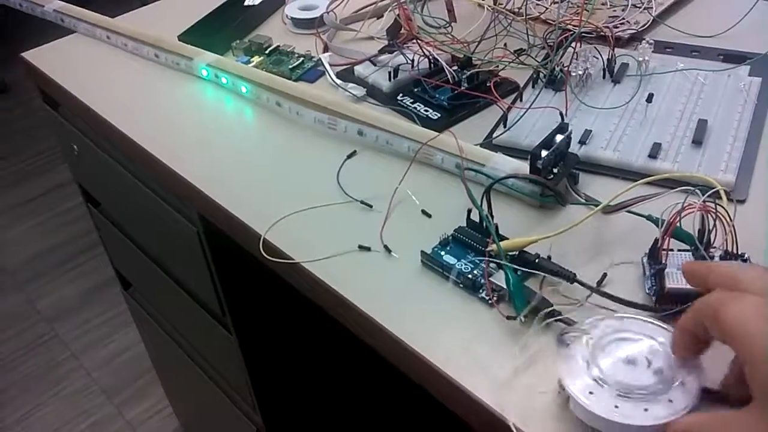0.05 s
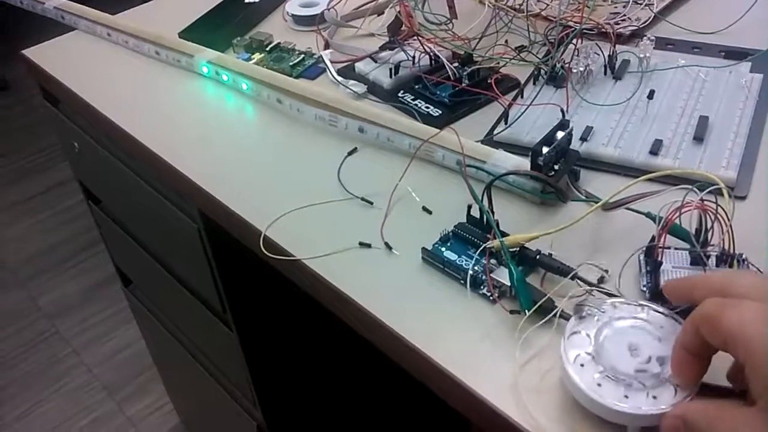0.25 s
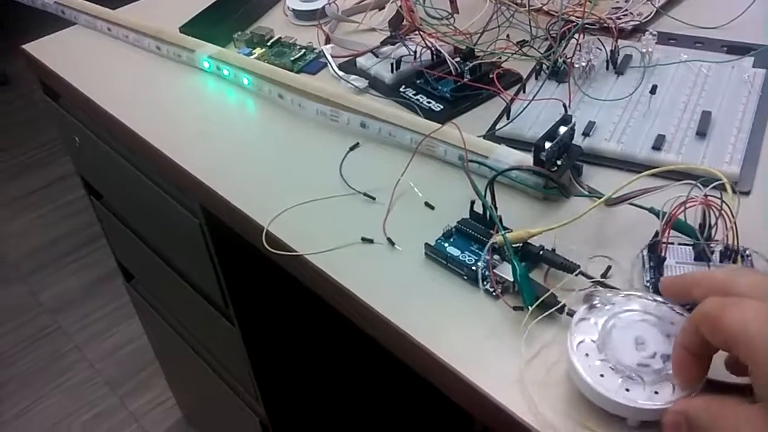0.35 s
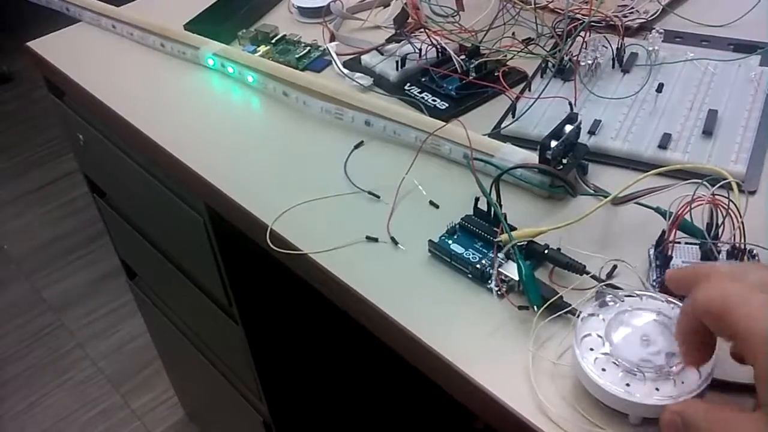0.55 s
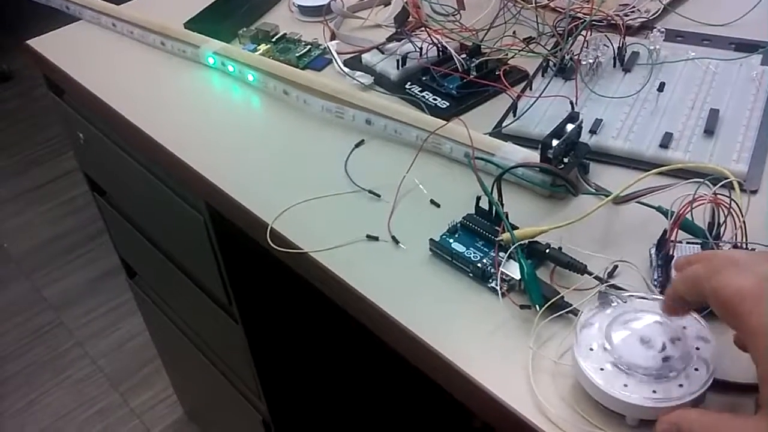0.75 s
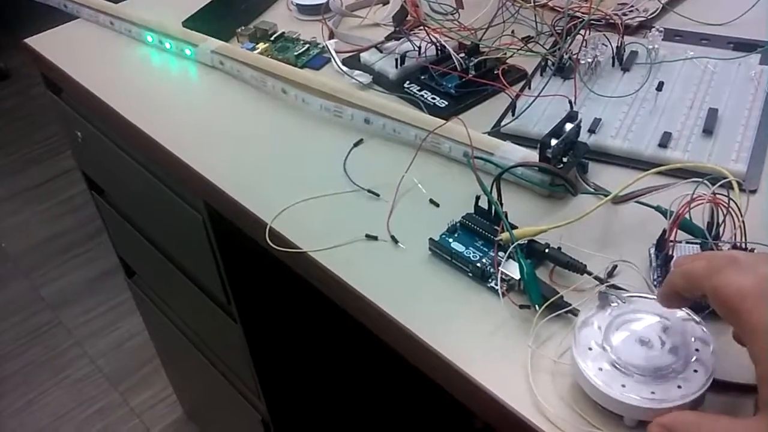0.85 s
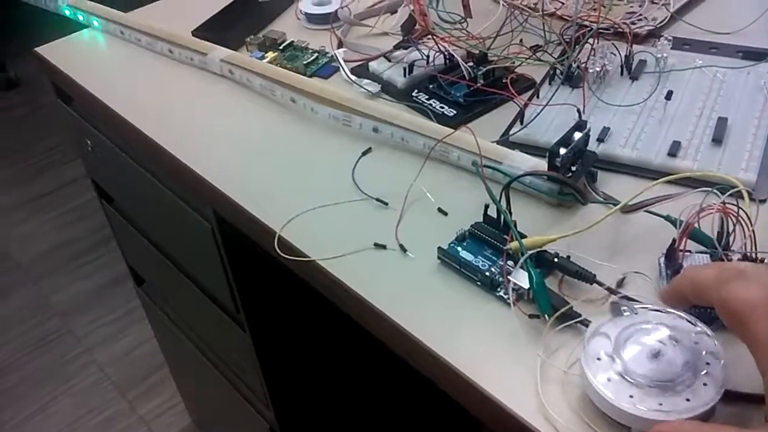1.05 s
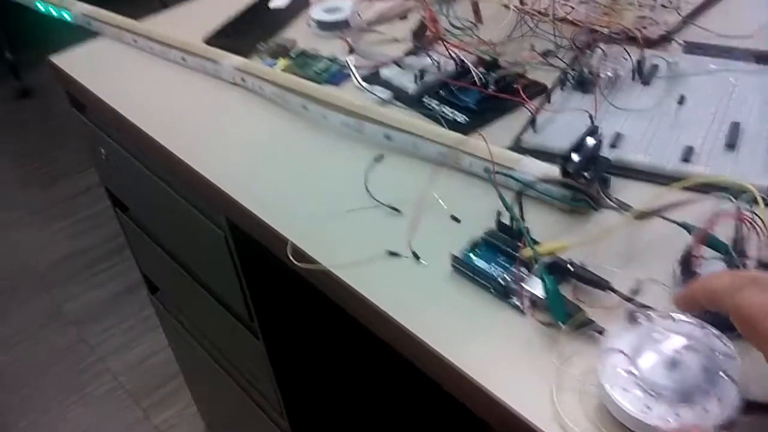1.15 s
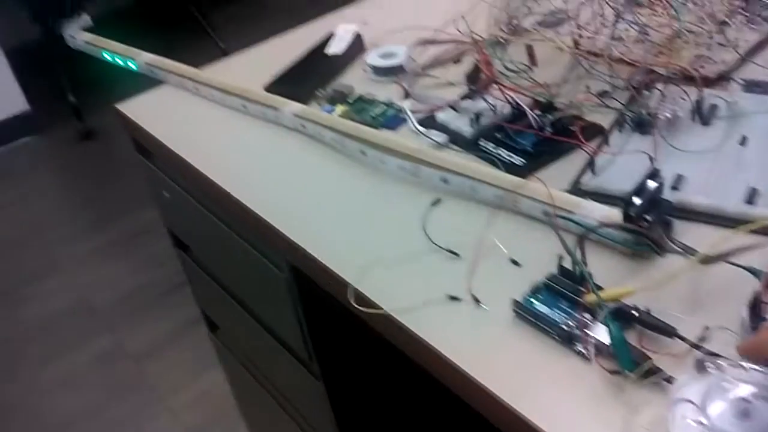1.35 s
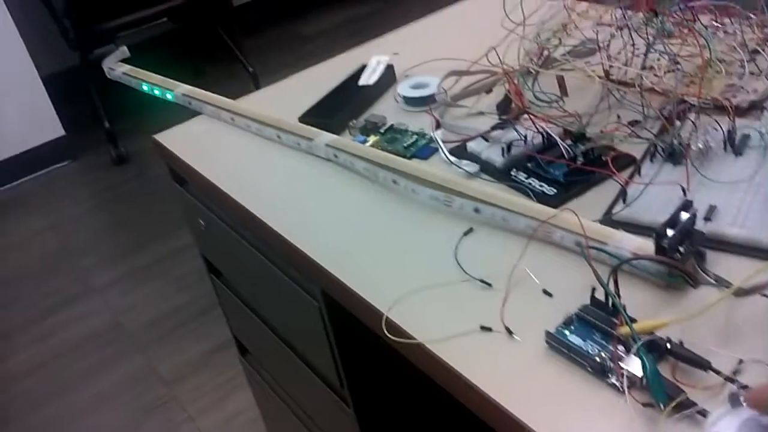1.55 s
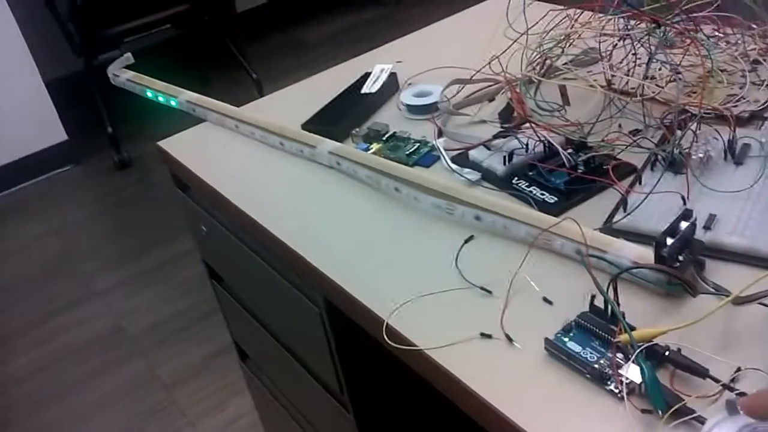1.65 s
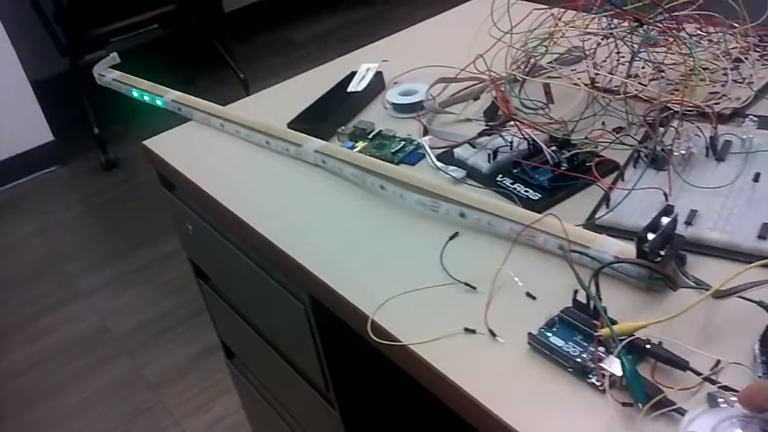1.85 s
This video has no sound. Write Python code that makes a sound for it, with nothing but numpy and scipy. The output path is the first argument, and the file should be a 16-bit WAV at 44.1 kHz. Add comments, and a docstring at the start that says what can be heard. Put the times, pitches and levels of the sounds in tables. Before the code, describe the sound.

A rotary telephone dial is wound with a short scrape and clacks against its stop. It is released with a second clack, then ticks and whirs back to rest, in a slightly echoing room with quiet ventilation.

```python
"""A scrape is heard first: a finger winds a rotary telephone dial, rubbing the wheel on its housing.
It clacks against the stop and is let go with a second clack; both set the dial and desk ringing.
The dial ticks free, its governor (the speed brake) whirrs as it runs back, and it knocks softly to rest.
Around it, a bare room echoes and the ventilation rumbles quietly."""
import sys
import numpy as np
from scipy import signal
from scipy.fft import rfft, irfft
from scipy.io import wavfile

SR = 44100
rng = np.random.default_rng(int(sys.argv[2]) if len(sys.argv) > 2 else 0)


def unload_wav(signal):
    """Save mono or channel-first audio to the path in sys.argv[1] as 16-bit WAV at rate SR, clipped to [-1, 1]."""
    wavfile.write(
        sys.argv[1],
        SR,
        np.round(np.clip(np.atleast_2d(signal).T, -1, 1) * 32767).astype(np.int16),
    )


N = 83790
TIME = np.arange(N) / SR
HZ = np.maximum(np.fft.rfftfreq(N, 1 / SR), 1)

# A fade time (t60) is how long a sound takes to drop by 60 dB.
# The clacks at the stop and on release:
# (time [s], rattle level [dB], rattle length [s], rattle fade time [s], ring build-up [s])
DIAL_CLACKS = [(.2380, -22.5, 0.012, 0.017, 0.0026), (0.6392, -27.5, 0.0027, 0.027, 0.0017)]


def clack_ring():
    """Each clack sets dial and desk ringing; the low tones swell last."""
    # Their natural tones: (pitch [Hz], fade time [s], level at the stop [dB], level on release [dB])
    tones = [(160.5, 0.11, -40.5, -42), (468, .065, -30.5, -42), (548.6, 0.055, -29.5, -37),
             (690, .04, -49, -40.5), (797, 0.049, -34, -69), (901, 0.065, -31, -55),
             (1033.7, 0.06, -27.5, -40.5), (1062, 0.066, -27.5, -45), (1181, 0.04, -55, -29.5),
             (1327, 0.027, -39.5, -30), (1607, 0.063, -28, -36.5), (1845, 0.033, -41, -29.5),
             (2194, 0.03, -28, -41), (2463, 0.0495, -33.5, -43), (4013, .024, -23.5, -54),
             (5430, 0.012, -21.5, -42), (6260, 0.015, -17.5, -34), (6840, 0.009, -16.5, -33)]
    lag_cycles = 4.2
    out = np.zeros(N)
    for clack, (start, *_, rise) in enumerate(DIAL_CLACKS):
        for hz, t60, *levels in tones:
            swell = rise + lag_cycles / max(hz, 400)
            tone = np.sin(2 * np.pi * (hz * TIME + rng.random()))
            out += from_db(levels[clack]) * tone * burst(start, t60, rise=swell, hold=swell)
    return out


def clack_rattle():
    """In each clack the parts rattle against each other for a few milliseconds."""
    # Tone colour of the rattle, one list per clack: (frequency [Hz], relative level [dB])
    colours = [
        [(100, -24.5), (250, -7.5), (900, -3.5), (1300, -3), (2800, -7.5), (4200, -3.5), (7000, -2.5),
         (8800, -13), (10000, -28), (16000, -39)],
        [(100, -3), (500, 4), (1800, -9), (2800, -9), (5300, -13), (6800, 6.5), (8000, -8.5), (9500, -24.5),
         (16000, -34)],
    ]
    out = np.zeros(N)
    for (start, db, length, t60, _), colour in zip(DIAL_CLACKS, colours):
        rattle = noise(from_db(at_hz(colour, HZ)))
        out += from_db(db) * rattle * burst(start, t60, rise=.0005, hold=length)
    return out


def winding():
    """The wheel rubs on its housing, and tiny slips rasp in the works as it speeds up."""
    # How hard the wheel rubs: (time [s], level [dB])
    effort = [(0, -48.5), (.06, -51.5), (.132, -50.5), (.140, -44), (.19, -40.5), (.215, -40.5),
              (.236, -43.5), (.25, -75)]
    # Tone colour of the rubbing: (frequency [Hz], relative level [dB])
    colour = [(80, -16), (200, -6.5), (560, 7), (1100, -5.5), (1900, -11.5), (2180, -1.5), (2600, -10),
              (6000, -10), (10000, -31.5), (16000, -50)]
    slips_per_s, rub_offset_db, rasp_peak_db = 3500, -3, -44
    times, levels = np.transpose(effort)
    effort_db = np.interp(TIME, times, levels)
    rasp_db = rasp_peak_db + 2.5 * (effort_db - levels.max())  # swells more steeply than the rub
    slips = (rng.random(N) < slips_per_s / SR) * rng.standard_normal(N)
    rasp = unit_level(irfft(rfft(slips) * metal_works(), N))
    rub = noise(from_db(at_hz(colour, HZ)))
    return from_db(rub_offset_db + effort_db) * rub + from_db(rasp_db) * rasp


def metal_works():
    """How strongly the metal parts inside the dial (the works) ring at each frequency."""
    # Where they ring most: (frequency [Hz], width [Hz], level [dB])
    resonances = [(2180, 78, -26), (3410, 320, -13.5), (4170, 120, -5.5), (4910, 200, -4.5),
                  (5510, 140, -2), (6040, 300, 1.5), (7030, 400, -4), (7830, 220, -2), (9400, 4000, -14.5)]
    return sum((-1) ** k * from_db(db) / (1 + 1j * hz / width * (HZ / hz - hz / HZ))
               for k, (hz, width, db) in enumerate(resonances))


def ticks():
    """Small parts catch in the works, each bringing out its own part of the metal's ring."""
    # The catches: (time [s], level [dB], fade time [s], favoured frequency [Hz])
    catches = [(.001, -34.5, 0.018, 6530), (0.085, -48.5, 0.059, 3830), (0.108, -54, 0.11, 5800),
               (.138, -42, 0.063, 3000), (0.186, -35, 0.019, 5860), (0.202, -43, 0.18, 5100),
               (.277, -34, .03, 6000), (0.283, -27.5, 0.014, 6940), (0.336, -32.5, 0.035, 6760),
               (0.355, -38.5, 0.017, 7400), (0.568, -46.5, 0.016, 6370), (0.799, -39, 0.045, 5050),
               (.800, -49.5, 0.046, 11300), (0.813, -52.5, 0.11, 3700), (0.842, -55.5, 0.3, 5900),
               (0.8623, -35.5, 0.023, 2620), (0.9018, -45.5, 0.1, 7300), (0.906, -45.5, 0.065, 2650),
               (0.933, -45.5, 0.025, 7500), (1.232, -54, 0.079, 2330), (1.254, -36, 0.014, 6260),
               (1.451, -61.5, 0.14, 6940)]
    width_octaves = .47
    metal = metal_works()
    out = np.zeros(N)
    for start, db, t60, hz in catches:
        colour = metal / (1 + (np.log2(HZ / hz) / width_octaves) ** 2)
        out += from_db(db) * burst(start, t60, rise=.0016) * noise(colour)
    return out


def gear_whirr():
    """On the run back the gear teeth scuff lightly, in much the same pattern on every turn."""
    # Tooth contacts in one turn of the governor gear: (position [share of a turn], relative level [dB])
    teeth = [(.05, 1), (.15, 1), (.27, 0), (.46, 0), (.58, 2), (.78, -1)]
    start_s, end_s, turn_s, jitter_s = .9265, 1.229, .0496, .0006
    whirr_db, spread_db = -49.5, 1.5
    scuffs = np.zeros(N)
    for turn_start in np.arange(start_s, end_s, turn_s):
        for share, db in teeth:
            when = turn_start + share * turn_s + jitter_s * rng.standard_normal()
            if when < end_s:
                strength = from_db(db + spread_db * rng.standard_normal())
                scuffs += strength * burst(when, t60=.033, rise=.0026)
    return from_db(whirr_db) * scuffs * noise(metal_works())


def spring_snaps():
    """The switch springs snap with a very high, short ring."""
    # The snaps: (time [s], level [dB])
    snaps = [(.2765, -39.5), (1.253, -43)]
    ring_hz, width_hz = 14700, 420
    zing = noise(1 / (1 + 1j * (HZ - ring_hz) / width_hz))
    return zing * sum(from_db(db) * burst(start, t60=.0193) for start, db in snaps)


def housing_knocks():
    """The housing bumps dully on the desk, each time with a hollow ring at its own pitch. The first row is no
    bump but a long, low hum near 210 Hz at the very start."""
    # The bumps, the first being the low hum: (time [s], level [dB], fade time [s], ring pitch [Hz])
    bumps = [(0.008, -45, 0.36, 212), (0.064, -40, .035, 776), (0.137, -38.5, 0.01, 2040),
             (0.791, -43.5, 0.028, 704), (1.227, -50, 0.097, 680), (1.743, -46.5, 0.086, 1385),
             (1.813, -63, 0.042, 745)]
    # Tone colour they all share: (frequency [Hz], relative level [dB])
    colour = [(60, -10), (170, 6), (600, -1.5), (900, -3), (1300, -8.5), (2100, -8), (2800, -29),
              (8000, -24.5), (16000, -60)]
    boost_db, width_octaves = 7.5, .19
    out = np.zeros(N)
    for start, db, t60, hz in bumps:
        hollow_db = boost_db * np.exp(-(np.log2(HZ / hz) / width_octaves) ** 2)
        thud = noise(from_db(at_hz(colour, HZ) + hollow_db))
        out += from_db(db) * thud * burst(start, t60, rise=.002, hold=.005)
    return out


def room_echo(sound):
    """Quick echoes off the desk, then a smooth tail that dies sooner in the treble."""
    # The room's tail: (frequency [Hz], fade time [s], level [dB])
    room = [(151.3, 0.53, -4), (500, 0.74, -4.5), (910, 1, -4.5), (1360, 0.91, -7.5), (2450, 0.87, -3.5),
            (4800, 0.63, -13), (7000, 0.72, -14), (9000, 0.71, -17.5), (16000, .25, -30.5)]
    first_echo_s, desk_db = .0057, -16.5
    edges = np.geomspace(90, 17000, 48)  # frequency bands, Hz
    white = rfft(rng.standard_normal(N))
    echoes = np.zeros(N)
    for low, high in zip(edges, edges[1:]):
        hz = np.sqrt(low * high)
        band = irfft(white * (HZ >= low) * (HZ < high), N)
        tail = band * burst(first_echo_s, t60=at_hz(room, hz), rise=.0017)
        band_share = 2 * (high - low) / SR
        echoes += from_db(at_hz(room, hz, column=2)) * np.sqrt(band_share) * tail / np.linalg.norm(tail)
    desk = rng.standard_normal(N) * burst(first_echo_s, t60=.045)
    echoes += from_db(desk_db) * desk / np.linalg.norm(desk)
    return signal.fftconvolve(sound, echoes)[:N]


def ventilation():
    """Steady hiss over a ventilation rumble that wavers."""
    # Tone colour of rumble and hiss: (frequency [Hz], relative level [dB])
    colour = [(25, -48), (55, -21), (105, -20), (150, -10), (195, -1), (260, -4.5), (330, -2), (450, -10.5),
              (650, -19), (950, -22), (1400, -33), (2800, -39), (4900, -39.5), (6900, -32.5), (10000, -35),
              (16000, -29.5)]
    air_db, rumble_below_hz, waver_db, wavers_per_s = -55.5, 450, 2.2, 11
    steady = noise(from_db(at_hz(colour, HZ)))
    rumble = irfft(rfft(steady) / (1 + (HZ / rumble_below_hz) ** 6), N)
    drift = noise(np.exp(-np.log2(HZ / wavers_per_s) ** 2))
    waver = unit_level(from_db(waver_db * drift))
    return from_db(air_db) * (steady + (waver - 1) * rumble)


def from_db(db):
    """Turn decibels into a volume factor."""
    return 10 ** (np.asarray(db) / 20)


def unit_level(x):
    """Scale a signal so its average level (rms) is 1."""
    return x / np.sqrt(np.mean(x ** 2) + 1e-20)


def at_hz(points, hz, column=1):
    """Read a table at any frequency, blending between rows on a pitch scale."""
    points = np.array(points)
    return np.interp(np.log(hz), np.log(points[:, 0]), points[:, column])


def noise(colour):
    """Noise at level 1; colour sets the relative strength of each frequency."""
    return unit_level(irfft(rfft(rng.standard_normal(N)) * colour, N))


def burst(start, t60, rise=.0012, hold=0):
    """A volume curve that rises, holds and dies away; all times in seconds."""
    age = np.maximum(TIME - start, 0)
    return np.minimum(age / rise, 1) * from_db(-60 * np.maximum(age - hold, 0) / t60)


def scene():
    """The dial, its echoes and the ventilation, in mono."""
    contacts = winding() + clack_rattle() + ticks() + spring_snaps() + housing_knocks() + gear_whirr()
    # The small body gives off little deep bass.
    contacts = signal.sosfilt(signal.butter(3, 103.3, "high", fs=SR, output="sos"), contacts)
    ring = clack_ring()
    # High tones beam at the listener, so mainly the low ones fill the room.
    low_ring = signal.sosfilt(signal.butter(3, 1900, fs=SR, output="sos"), ring)
    return (contacts + ring + room_echo(contacts + low_ring) + ventilation())[None]


def record(dry):
    """Round off the loudest peaks and steeply cut the highest treble."""
    ceiling, cutoff_hz = .38, 15800
    rounded = ceiling * np.tanh(dry / ceiling)
    return signal.sosfilt(signal.ellip(12, .1, 80, cutoff_hz, fs=SR, output="sos"), rounded)


dry = scene()
out = record(dry)
unload_wav(out)
```